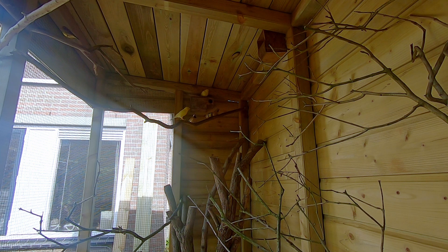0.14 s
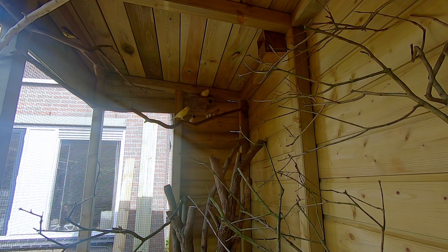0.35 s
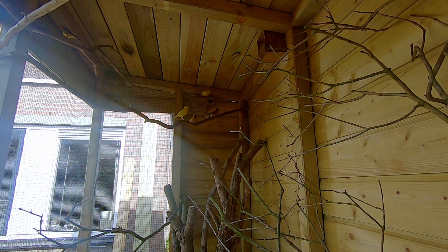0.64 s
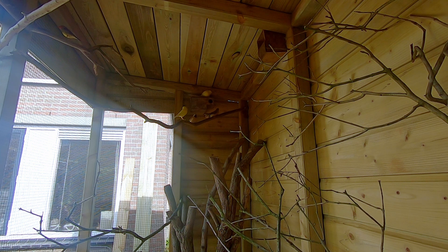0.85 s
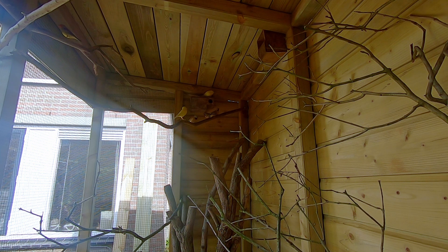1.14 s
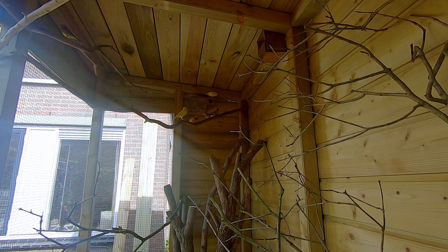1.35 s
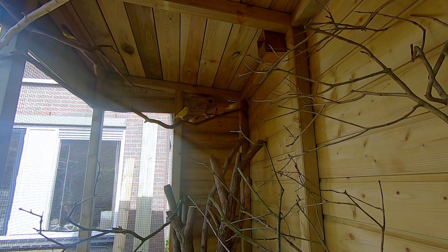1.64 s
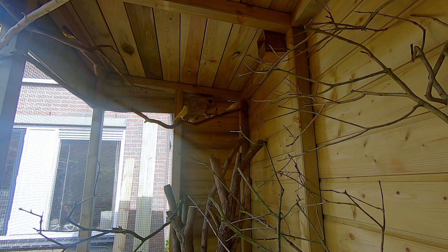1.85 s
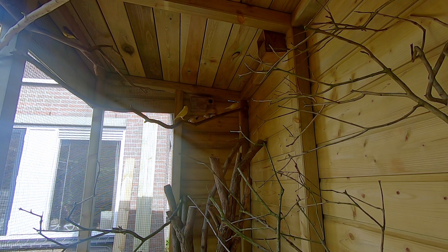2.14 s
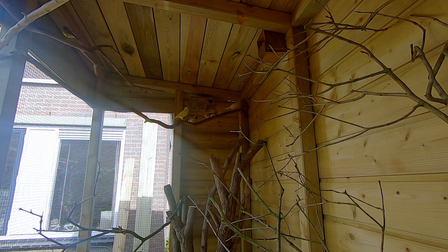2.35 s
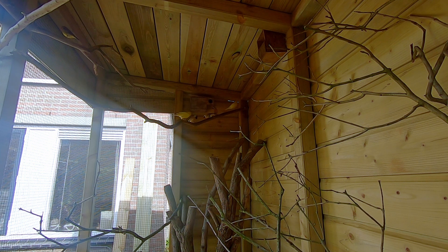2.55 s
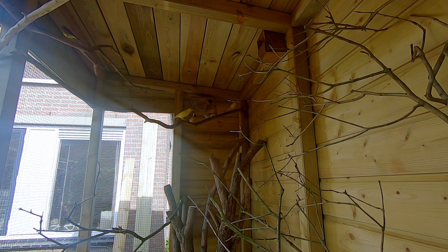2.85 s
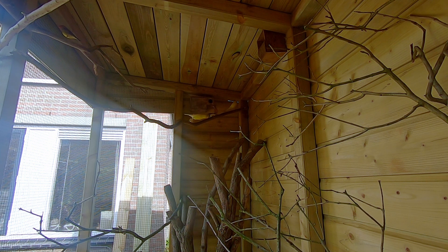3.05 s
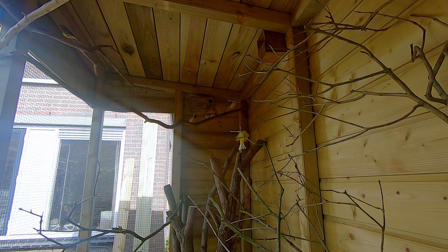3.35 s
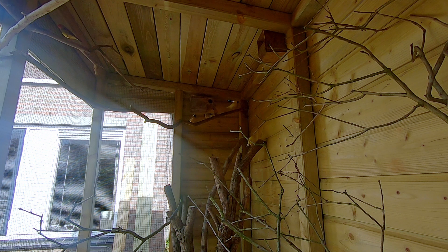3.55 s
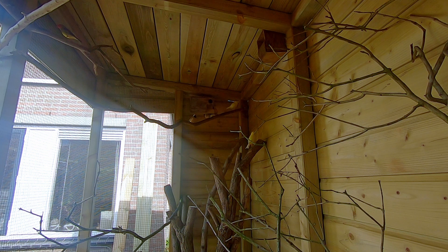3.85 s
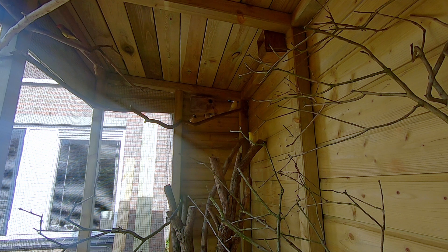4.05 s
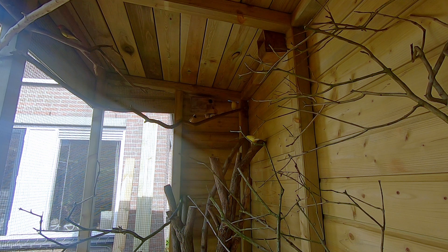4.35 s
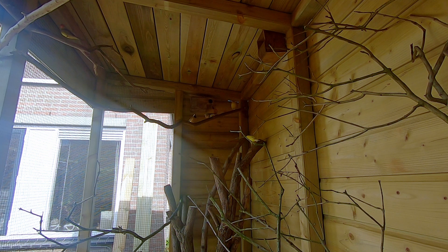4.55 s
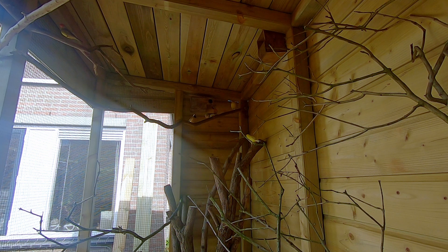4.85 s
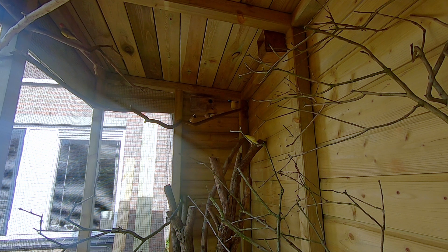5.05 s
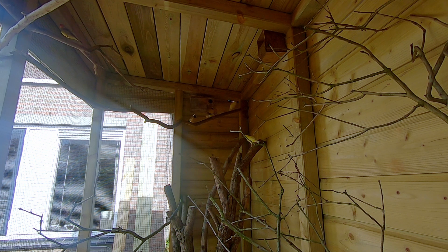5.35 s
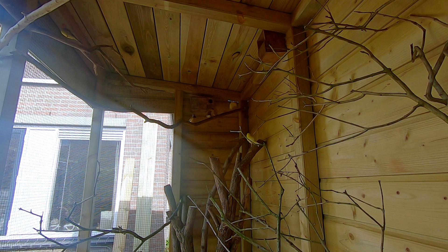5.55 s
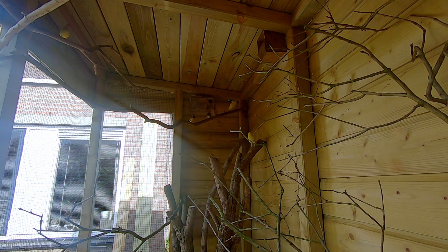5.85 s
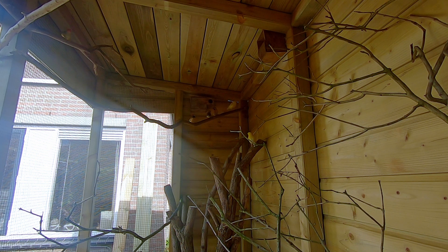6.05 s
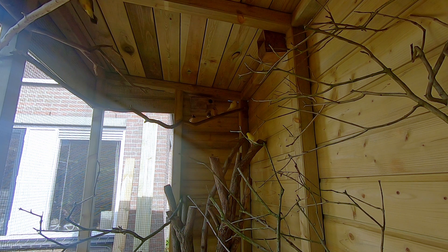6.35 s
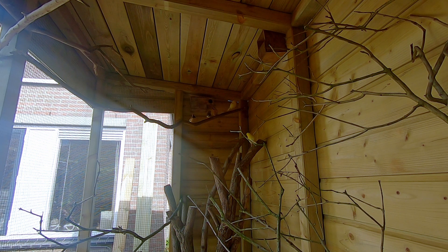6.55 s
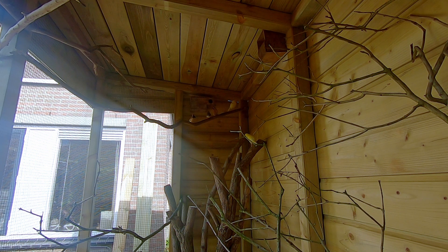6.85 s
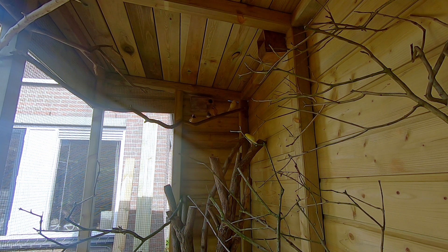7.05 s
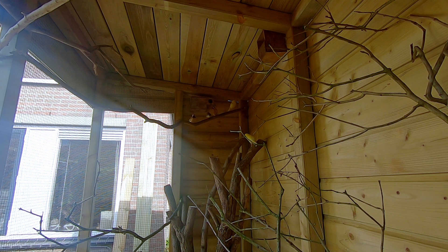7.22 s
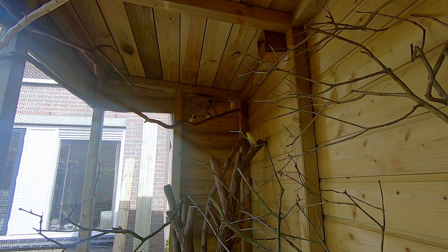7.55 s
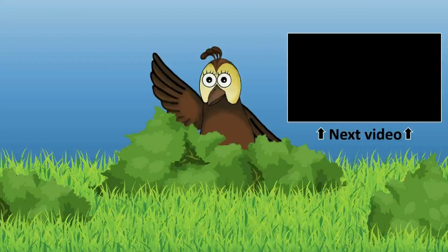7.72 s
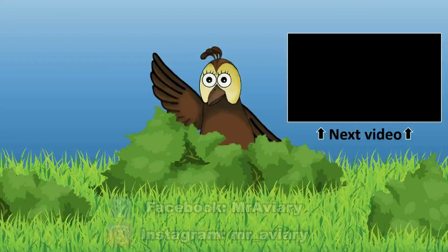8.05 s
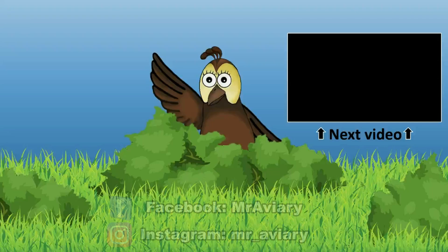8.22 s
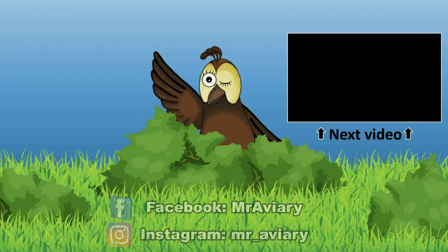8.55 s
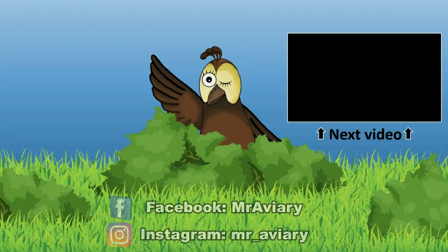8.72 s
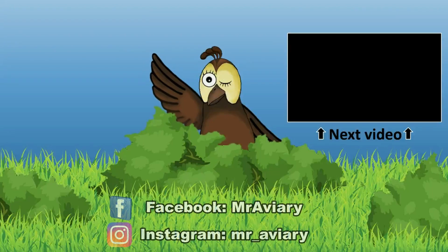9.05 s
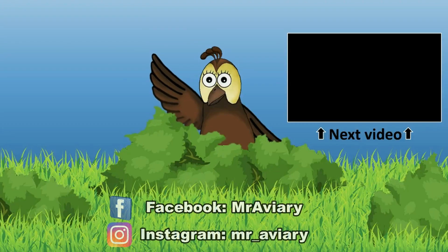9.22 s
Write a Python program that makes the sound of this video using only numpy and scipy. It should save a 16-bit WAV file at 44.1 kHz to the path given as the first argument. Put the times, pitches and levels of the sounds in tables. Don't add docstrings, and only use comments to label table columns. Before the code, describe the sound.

Caged birds chirp sharply and sing husky verses in a wooden aviary, over whistled wild garden song, wing flutters and a late passing car.

```python
import sys
import numpy as np
from scipy import signal
from scipy.fft import rfft, irfft
from scipy.io import wavfile
from scipy.ndimage import uniform_filter1d

SR = 44100
rng = np.random.default_rng(int(sys.argv[2]) if len(sys.argv) > 2 else 0)


def ratio(d):
    e = np.asarray(d, float) / 20
    return 10 ** e


def pcm_store(signal):
    levels = np.round(np.clip(np.atleast_2d(signal), -1, 1) * 32767)
    wavfile.write(sys.argv[1], SR, levels.astype(np.int16).T)


N = 414099


def rms_one(x):
    return x / np.sqrt(np.mean(x ** 2) + 1e-20)


def in_time(rows):
    s, *columns = np.transpose(rows)
    return [np.interp(np.arange(N) / SR, s, c) for c in columns]


def filtered(x, order, hz, kind="low"):
    return signal.sosfilt(signal.butter(order, hz, kind, fs=SR, output="sos"), x)


def drift(rate_hz):
    r = np.exp(-2 * np.pi * rate_hz / SR)
    noise = rng.standard_normal(N + SR // 2)
    settled = signal.lfilter([1], [1, -2 * r, r * r], noise)[SR // 2:]
    return rms_one(settled)


def pan(x, db):
    return x * ratio([[db / 2], [-db / 2]])


def whistle(notes, octave_db, edge=.004, wobble_hz=0, flutter_db=0):
    out, clock = np.zeros(N), np.arange(N) / SR
    wobble_hz, flutter_db = wobble_hz + out, flutter_db + out
    for note in notes:
        s, hz, db = np.transpose(note)
        first = max(int((s[0] - edge) * SR), 0)
        last = min(int((s[-1] + edge) * SR), N)
        span = slice(first, last)
        t = clock[span]
        phase = 2 * np.pi * np.cumsum(np.interp(t, s, hz) + wobble_hz[span]) / SR
        fade = np.clip(np.minimum(t - s[0], s[-1] - t) / edge + 1, 0, 1) ** 2
        level = np.sqrt(2) * fade * ratio(np.interp(t, s, db) + flutter_db[span])
        out[span] += level * (np.sin(phase) + ratio(octave_db) * np.sin(2 * phase))
    return out


def glides(rows, attack, release, edge_db, bend):
    share = np.array([0, attack, .5 * (attack + 1 - release), 1 - release, 1])
    level = edge_db * np.array([1, 0, 0, 0, 1])
    return [np.transpose([s + length * share, first + (last - first) * share ** bend, db + level])
            for s, length, first, last, db in rows]


def placed(shape, s, db):
    return np.array(shape) + [s, 0, db]


def trill(shape, first, period, first_db, last_db, count):
    levels = np.linspace(first_db, last_db, count)
    return [placed(shape, first + k * period, db) for k, db in enumerate(levels)]


def echoes(x, t60, gap, sparse):
    t = np.arange(SR // 2) / SR
    uneven = rng.exponential(1, (2, len(t))) ** sparse
    tail = rng.standard_normal((2, len(t))) * uneven * ratio(-60 * t / t60) * (t > gap)
    tail /= np.sqrt(np.sum(tail ** 2, axis=1, keepdims=True))
    return signal.fftconvolve(x[None], tail, axes=1)[:, :N]


def spells(rows):
    t = np.arange(N) / SR
    power = 1e-11
    for s, length, db in rows:
        away = np.maximum(np.maximum(s - t, t - s - length), 0)
        power = power + ratio(2 * (db - 153 * away))
    return 10 * np.log10(power)


# (frequency [Hz], likeness [0-1])
DIFFUSE_LIKENESS = [(60, .82), (150, .92), (300, .95), (450, .9), (700, .82), (2500, .65), (8000, .3)]


def at_hz(points, hz):
    table = np.array(points)
    return np.interp(np.log(hz), np.log(table[:, 0]), table[:, 1])


def coloured(spectrum, alike):
    hz = np.fft.rfftfreq(N, 1 / SR) + 1
    mid, side = rfft(rng.standard_normal((2, N))) * ratio(at_hz(spectrum, hz))
    c = np.clip(alike * at_hz(DIFFUSE_LIKENESS, hz), 0, 1)
    both = np.sqrt(1 + c) * mid + np.sqrt(1 - c) * side * [[1], [-1]]
    return irfft(both, N) * N / np.sqrt(np.sum(np.abs(both[:, hz < 1500]) ** 2))


# (time after onset [s], pitch [Hz], level [dB])
CHIP_SHAPE = [(-.035, 6190, -26.5), (-.021, 6060, -34), (-.008, 5150, -20), (0, 4760, -1.5),
              (.009, 4740, -0.5), (.02, 4703, -10), (.028, 4710, -25)]
DRAWL_SHAPE = [(0, 5800, -11), (.011, 5730, 3), (.021, 5370, -4), (.031, 5540, -10.5), (.041, 5430, -7.5),
               (.053, 4803, -0.5), (.1, 4730, -4), (.14, 4493, -2.5), (.153, 4350, -24)]
# (time after onset [s], pitch [Hz], level [dB])
FLICK_SHAPE = [
    (0.022, 5670, -2),
    (.027, 7030, -12),
    (.032, 6900, -22.5),
]
# (time [s], level [dB], left-right [dB], right lag [samples])
CHIP_CALLS = [
    (0.974, -22.5, 1.5, 0),
    (2.259, -26, 0.1, 0),
    (3.546, -23.5, -1, 0),
]
DRAWL_CALLS = [
    (5.433, -27, 0.5, 0),
    (8.593, -30, 2.8, 1),
]


def canaries():
    sung = [([CHIP_SHAPE], *row) for row in CHIP_CALLS]
    sung += [([DRAWL_SHAPE, FLICK_SHAPE], *row) for row in DRAWL_CALLS]
    flutter_db = 2.0 * drift(71)
    direct, calls = np.zeros((2, N)), np.zeros(N)
    for voices, s, db, left_db, lag in sung:
        notes = [placed(voice, s, db) for voice in voices]
        call = whistle(notes, octave_db=-30, flutter_db=flutter_db)
        direct += pan(np.array([call, np.roll(call, round(lag))]), left_db)
        calls += call
    walls = echoes(calls, t60=0.11, gap=0.00387, sparse=0.47)
    return direct + ratio(-5.5) * walls + ratio(-20.0) * walls.sum(axis=0)


# (time [s], length [s], first pitch [Hz], last pitch [Hz], level [dB])
FINCH_NOTES = [(1.478, .012, 4940, 4540, -58), (1.482, 0.026, 7800, 7800, -68),
               (1.535, 0.0198, 5220, 4280, -59), (1.585, .04, 4310, 2960, -64),
               (1.64, 0.039, 5050, 5150, -72), (1.7, 0.064, 3080, 3150, -70.5),
               (1.763, .036, 4900, 4250, -52.5), (1.795, 0.023, 4100, 3230, -57),
               (1.85, 0.036, 3400, 3500, -64.5), (1.93, .055, 5200, 5170, -72.5),
               (1.955, 0.027, 7770, 7660, -68.5), (1.95, 0.068, 3800, 4220, -69.5),
               (2.0, 0.059, 4430, 5170, -54.5), (2.055, 0.038, 5370, 5340, -60),
               (2.04, .045, 4270, 4010, -54.5), (2.135, .03, 3140, 3150, -60),
               (2.222, 0.011, 5720, 6200, -50.5), (2.345, 0.0076, 5920, 5200, -49.5),
               (2.35, 0.034, 6700, 6600, -66), (2.415, .007, 5000, 4000, -53)]
# (shift [s], level [dB])
FINCH_REPEATS = [
    (-1.287, -2),
    (0, 0),
    (1.285, 0),
]
# (time [s], fundamental [Hz], level [dB])
NASAL_CALLS = [
    [(2.515, 1095, -82), (2.55, 1040, -77), (2.585, 1020, -75)],
    [(2.59, 1000, -78), (2.62, 1056, -75), (2.648, 1070, -76)],
]
# (time after onset [s], pitch [Hz], level [dB])
TICK_SHAPE = [
    (-.004, 7030, 1),
    (0, 5370, 8.5),
    (.002, 4750, 12.5),
    (.005, 2620, -10),
]
# (time [s], level before a common lift [dB])
FINCH_TICKS = [
    (0.0855, -59.5),
    (1.373, -58.5),
    (2.6587, -57.5),
    (3.948, -57.5),
]


def finches():
    verse = glides(FINCH_NOTES, attack=0.64, release=0.52, edge_db=-7.0, bend=1.2)
    sung = [placed(note, s, db) for s, db in FINCH_REPEATS for note in verse]
    verses = whistle(sung, octave_db=-21.5, wobble_hz=130 * drift(210), flutter_db=5.3 * drift(87))
    nasal = [np.array(call) * [1, k, 1] + [0, 0, 8 - 1.5 * k] for call in NASAL_CALLS for k in range(3, 9)]
    verses += whistle(nasal, octave_db=-60, wobble_hz=60 * drift(150), flutter_db=3.7 * drift(60))
    ticks = [placed(TICK_SHAPE, s, db + 14.5) for s, db in FINCH_TICKS]
    ticks = whistle(ticks, octave_db=-35, edge=0.002)
    near = echoes(verses + ticks, t60=0.09, gap=0.002, sparse=1.1)
    far = echoes(verses + ticks, t60=0.25, gap=0.0055, sparse=0.79)
    return 0.8 * verses + .5 * ticks + ratio(0.5) * near + ratio(-16) * far


# (time [s], peak level [dB])
LANDINGS = [(0.1411, -53), (0.4964, -50), (0.854, -55), (1.1334, -64), (1.267, -48), (1.4744, -62),
            (3.2221, -60), (3.2594, -57), (3.3444, -53), (3.6346, -59), (7.226, -68)]


def perch():
    s, db = np.transpose(LANDINGS)
    hits = np.zeros(N)
    hits[(s * SR).astype(int)] = ratio(db + 3)
    t60_s = .006
    dying = signal.lfilter([1], [1, -ratio(-60 / (t60_s * SR))], hits + 1e-18)
    snap = filtered(dying * rng.standard_normal(N), 2, [1500, 11000], "band")
    return snap + ratio(-2.0) * echoes(snap, t60=.08, gap=.002, sparse=.8)


# (frequency [Hz], density [dB per Hz])
FEATHER_SPECTRUM = [(120, -10.5), (220, 0), (500, -11), (1500, -3.5), (3500, 1.5), (7000, 2), (10500, -13),
                    (15000, -27)]
# (time [s], length [s], level [dB])
WING_FLURRIES = [(0.0, 4.03, -83.5), (0.0, 0.17, -71), (0.45, 0.11, -70), (1.2, 0.13, -72.5),
                 (1.7, 0.11, -79.5), (2.5, 0.17, -81), (3.26, .26, -71), (3.72, 0.23, -75.5),
                 (4.0, 3.08, -88.5), (5.03, 0.25, -73.5), (6.4, 0.23, -75)]


def wings():
    beat_hz = 22.5
    cycle = 2 * np.pi * beat_hz * (np.arange(N) / SR - 3.35)
    beat_db = 4 * np.cos(cycle + .4 * drift(3)) + 1.5 * drift(120)
    return rms_one(coloured(FEATHER_SPECTRUM, alike=0.7)) * ratio(spells(WING_FLURRIES) + 11.5 + beat_db)


# (time [s], first level [dB], full level [dB], echo level [dB])
TIT_LOW_NOTES = [(-0.12, -50, -38, -44.5), (0.319, -43.5, -33, -47), (0.766, -40.5, -35.5, -46.5),
                 (3.665, -49, -42.5, -52), (4.162, -43.5, -33.5, -45.5), (4.605, -44, -39, -44.5),
                 (5.024, -43.5, -37, -43), (5.444, -51, -39, -44.5), (5.962, -43.5, -40, -45),
                 (8.915, -49, -45.5, -51.5), (9.358, -50, -43, -50)]


def tit_low_note(s, first_db, full_db, echo_db):
    after = np.array([0, .03, .06, .084, .12, .127, .15, .24, .39])
    db = [first_db - 15.5, first_db, first_db + 2.5, full_db, full_db - 4,
          echo_db - 10, echo_db, echo_db - 19, echo_db - 28]
    hz = 3862 - 110 * (after == 0) - 48 * after
    return np.transpose([s + after, hz, db])


def tit_low():
    notes = [tit_low_note(*row) for row in TIT_LOW_NOTES]
    tone = whistle(notes, octave_db=-45, edge=.01, wobble_hz=12 * drift(8), flutter_db=1.5 * drift(40))
    t, starts = np.arange(N) / SR, np.array(TIT_LOW_NOTES)[:, 0]
    since = t - starts[np.searchsorted(starts, t) - 1]
    beat_hz, peak_s, floor = 37, .093, .25
    beat = floor + np.abs(np.cos(np.pi * beat_hz * (since - peak_s) + .4 * drift(6)))
    return tone * np.where((since > .068) & (since < .17), beat, 1)


# (time after onset [s], pitch [Hz], level [dB])
HOOK_SHAPE = [(-.002, 6000, -22), (.003, 5740, -6), (.014, 5660, -7), (.066, 5600, -16), (.075, 5620, -30),
              (.2, 5620, -42)]
# (time [s], peak level [dB])
TIT_HIGH_NOTES = [(0.0902, -31), (0.5296, -32.5), (0.977, -32.5), (3.873, -35), (4.3637, -32),
                  (4.8042, -32), (5.231, -32), (5.6875, -35), (6.1798, -33), (9.134, -40.5)]


def tit_high():
    notes = [placed(HOOK_SHAPE, s, db) for s, db in TIT_HIGH_NOTES]
    return whistle(notes, octave_db=-40, flutter_db=2.0 * drift(60))


# (time [s], length [s], first pitch [Hz], last pitch [Hz], level [dB])
BLACKBIRD_NOTES = [ (0.125, 0.074, 2780, 2160, -59), (.185, 0.017, 2700, 1990, -57.5),
                   (.26, 0.017, 2170, 2050, -61.5), (2.285, 0.1, 1770, 2740, -50.5),
                   (2.485, 0.084, 2550, 2550, -45), (3.16, 0.012, 2110, 2490, -49.5),
                   (3.172, 0.013, 2530, 2540, -46.5), (3.184, .01, 2450, 2250, -48),
                   (3.2, .045, 2490, 2400, -61), (3.46, 0.12, 2520, 2062, -58.5),
                   (3.65, .09, 2920, 2730, -66), (3.75, 0.053, 3180, 3340, -45),
                   (3.815, 0.049, 3640, 3500, -46), (4.64, 0.084, 2820, 2690, -70),
                   (4.68, 0.034, 2100, 2200, -71), (4.91, 0.034, 2465, 2600, -69),
                   (6.745, 0.067, 1800, 2300, -53), (6.8, 0.037, 2317, 2720, -50),
                   (6.97, 0.051, 1660, 1632, -59.5), (7.07, .12, 1638, 1706, -59),
                   (7.14, 0.034, 2100, 2390, -58.5), (7.17, .09, 2300, 2250, -53.5),
                   (7.255, 0.087, 2200, 2176, -47.5), (7.34, 0.048, 2094, 2200, -55),
                   (7.885, .07, 1980, 2020, -48.5), (7.955, .022, 1950, 1760, -57),
                   (8.28, 0.19, 2060, 2280, -58), (8.45, 0.081, 2240, 2190, -55),
                   (8.64, 0.081, 2050, 2390, -60), (8.78, 0.14, 1850, 1950, -62.5)]
WARBLER_NOTES = [ (3.335, 0.053, 7300, 6060, -59), (3.35, .25, 6240, 6040, -62),
                 (3.73, 0.051, 6140, 6460, -56.5), (3.82, .035, 7560, 7120, -65),
                 (5.8, 0.17, 3170, 3320, -64), (6.02, 0.18, 7300, 6630, -59), (6.18, 0.12, 6600, 6670, -57),
                 (6.37, .3, 7010, 6460, -58), (6.47, 0.082, 4270, 4270, -59),
                 (6.699, 0.05, 6150, 5470, -46), (6.752, .012, 5510, 5620, -51.5),
                 (6.825, 0.052, 6180, 5320, -46.5), (7.0, 0.093, 4170, 4190, -66),
                 (7.73, 0.031, 7000, 6550, -73), (7.86, 0.054, 7400, 6270, -72),
                 (8.21, .1, 6250, 6500, -72), (8.3, 0.34, 6420, 6700, -68), (8.5, .045, 5900, 5940, -69),
                 (8.7, 0.21, 6100, 6000, -73), (8.755, 0.045, 4200, 4100, -59), (9.18, .2, 6140, 6750, -76)]


def clear_song():
    notes = glides(BLACKBIRD_NOTES, attack=0.38, release=0.14, edge_db=-6.0, bend=.85)
    notes += glides(WARBLER_NOTES, attack=0.19, release=0.2, edge_db=-4.0, bend=0.51)
    return whistle(notes, octave_db=-42, edge=.012, wobble_hz=14 * drift(25), flutter_db=2.4 * drift(35))


# (time [s], length [s], first pitch [Hz], last pitch [Hz], level [dB])
BUZZ_NOTES = [ (0.0, 0.0387, 1990, 1864, -54.5), (7.7, 0.111, 2490, 2450, -58.5),
              (7.6, 0.075, 3120, 3930, -67.5), (2.33, 0.075, 1702, 2500, -59.5),
              (2.82, 0.15, 2700, 2250, -55.5), (.63, .12, 3550, 3250, -62), (2.955, 0.04, 2250, 1800, -61),
              (3.015, 0.184, 1894, 1865, -60), (6.77, 0.097, 1853, 2496, -56.5),
              (7.36, 0.078, 2096, 1746, -56.5), (7.43, 0.094, 1752, 1837, -57.5),
              (7.505, .145, 1816, 2584, -56), (7.68, 0.1084, 2690, 2900, -58.5),
              (7.68, 0.071, 2413, 1760, -51.5), (7.75, 0.0526, 2092, 1620, -58)]


def blackbird_buzz():
    t = np.arange(N) / SR
    notes = glides(BUZZ_NOTES, attack=0.22, release=0.75, edge_db=-0.5, bend=0.96)
    shake_hz = np.where(t < 2.98, 105, np.where(t < 5, 65, 50))
    throb = np.sin(2 * np.pi * shake_hz * t + 1.2 * drift(20))
    depth_hz = np.where(abs(t - 2.89) < .08, 280, 150)
    buzz = whistle(notes, octave_db=-35, edge=.015, wobble_hz=depth_hz * throb + 90 * drift(300),
                   flutter_db=-3 * throb + 2 * drift(200))
    return filtered(buzz, 6, 1600, "high")


# (time [s], pitch [Hz], level [dB])
WARBLE_NOTE = [
    (6.89, 2140, -56),
    (6.97, 2180, -59),
    (7.07, 2150, -56),
]


def blackbird_warble():
    shake = np.cos(2 * np.pi * 29 * (np.arange(N) / SR - 6.9))
    return whistle([WARBLE_NOTE], octave_db=-30, wobble_hz=110 * shake, flutter_db=-3 * shake)


# (time after onset [s], pitch [Hz], level [dB])
ROLL_SHAPE = [(0, 4750, -9), (.014, 4290, -4), (.045, 4530, 0), (.065, 4570, -3), (.082, 4350, -8),
              (.1, 4280, -11)]
SLUR_SHAPE = [
    (0, 5900, -6),
    (.009, 5550, 0),
    (.022, 5050, -6),
]


def trills():
    first_s = 6.925
    notes = trill(ROLL_SHAPE, first_s, .1075, -53, -59, count=7)
    notes += trill(SLUR_SHAPE, 7.962, .0585, -60.5, -64, count=11)
    lift_hz = 178.5 * np.exp(-np.abs(np.arange(N) / SR - first_s) / 0.253)
    return whistle(notes, octave_db=-50, wobble_hz=30 * drift(31) + lift_hz, flutter_db=3.9 * drift(60))


# (time [s], length [s], first pitch [Hz], last pitch [Hz], level [dB])
FAR_NOTES = [ (1.299, 0.113, 4800, 3700, -60.5), (3.8, 0.053, 6000, 6300, -68),
             (4.703, 0.12, 5700, 4910, -69), (5.3, 0.21, 3760, 3880, -58.5), (5.6, 0.12, 2546, 2474, -68.5),
             (5.68, 0.25, 3850, 3813, -57.5), (6.15, 0.149, 3850, 3747, -55), (6.42, .38, 3500, 3716, -64),
             (6.678, 0.0123, 5500, 6200, -48), (7.155, 0.057, 5700, 5200, -74),
             (7.56, 0.043, 3480, 3420, -71.5), (7.68, .17, 3000, 3200, -72), (4.46, 0.043, 4400, 4200, -60),
             (8.16, 0.13, 2200, 1950, -65), (8.0, .14, 1900, 2150, -68), (8.21, .19, 7500, 7500, -69),
             (7.985, .075, 7790, 7790, -73), (6.85, .13, 2900, 2850, -71), (6.66, .12, 3800, 3780, -64),
             (6.85, 0.085, 3400, 3300, -64.5), (7.42, .05, 4950, 4900, -73), (2.7, .04, 5750, 5200, -66.5),
             (5.1, 0.039, 2600, 2700, -68), (6.0, .29, 2230, 2190, -75)]


def far_birds():
    notes = glides(FAR_NOTES, attack=.3, release=0.45, edge_db=-5.5, bend=0.6)
    return whistle(notes, octave_db=-51, edge=.015, wobble_hz=30 * drift(60), flutter_db=3.7 * drift(45))


def garden():
    tit = tit_low()
    rough = blackbird_buzz() + trills()
    song = far_birds() + tit_high() + clear_song() + blackbird_warble() + rough
    tail = echoes(song + .6 * tit + 1.5 * rough, t60=.55, gap=.008, sparse=1.2)[0]
    return tit + song + ratio(-12.0) * tail


def coarse_sampling(x):
    slope = np.diff(x, prepend=0)
    bursts = ratio(4.5 * np.clip(drift(220), -2, 2))
    jitter = rms_one(filtered(rng.standard_normal(N), 4, 550))
    clock = np.cos(2 * np.pi * 16000 * np.arange(N) / SR)
    mirror = filtered(slope * clock * jitter, 6, 8000, "high")
    loudness = uniform_filter1d(np.abs(slope), size=200)
    crackle = filtered(rng.standard_normal(N), 2, 2500, "high") * loudness
    knee = loudness / (loudness + ratio(-63))
    damage = ratio(-11.0) * mirror + ratio(-12) * slope * jitter + ratio(-18.5) * crackle
    return x + knee * bursts * damage


# (time [s], length [s], level [dB])
CHATTER_SPELLS = [(0.0, 6.9, -79), (0.24, 0.062, -67), (0.62, 0.16, -71), (1.24, 0.017, -64.5),
                  (1.55, 0.28, -76.5), (2.25, .2, -72), (2.7, 0.1, -69.5), (3.22, 0.11, -72),
                  (3.58, 0.31, -68), (5.1, 0.16, -68), (5.5, 0.065, -66.5), (5.8, 1, -74.5),
                  (7.92, 1.5, -73)]


def chatter():
    notes = []
    for start, pitch, size, bend in rng.random((600, 4)):
        s, hz = start * N / SR, 2900 * 1.9 ** pitch
        db, b = 8 * size - 3 * pitch, .3 * bend - .05
        notes.append(np.array([(s, hz * (1 + b), db - 8), (s + .012, hz, db), (s + .03, hz * (1 - b), db - 8)]))
    chirps = rms_one(whistle(notes, octave_db=-29.0, wobble_hz=120 * drift(300)))
    chirps = chirps * ratio(spells(CHATTER_SPELLS) + 8.5)
    tails = echoes(chirps, t60=.5, gap=.005, sparse=.5)
    return .25 * chirps + .6 * tails[0] + .8 * tails


# (time [s], level [dB])
CAR_PASS = [
    (7.84, -84),
    (7.95, -61),
    (8.2, -57.5),
    (8.8, -61),
    (9.39, -60),
]
# (frequency [Hz], density [dB per Hz])
ROAD_SPECTRUM = [(35, -49), (60, -21), (259, -12), (427, 5.5), (543, -8.5), (1610, -13.5), (2190, -7.5),
                 (6660, -16), (11000, -32), (14300, -86.5), (22000, -120)]


def car():
    level_db, = in_time([(4.8, -84.5)] + list(CAR_PASS))
    return ratio(level_db + 1.2 * drift(11.0)) * coloured(ROAD_SPECTRUM, alike=0.88)


# (time [s], level [dB])
ENGINE_LEVEL = [
    (4.8, -76.5),
    (5.4, -67.5),
    (7.3, -74.5),
    (7.9, -60.5),
    (8.3, -66),
    (9.0, -72),
]


def drone():
    noise = rng.standard_normal(N)
    hum = np.zeros(N)
    for hz, sharpness in [(170, 4.1), (420, 27)]:
        hum += signal.lfilter(*signal.iirpeak(hz, sharpness, fs=SR), noise)
    return rms_one(hum) * ratio(*in_time(ENGINE_LEVEL))


# (frequency [Hz], density [dB per Hz])
AIR_SPECTRUM = [(18, -7.5), (30, 3.5), (143, -3), (260, -11.5), (394, -0.5), (524, -13.5), (928, -15),
                (2490, -21), (4000, -18.5), (6000, -33.5), (10000, -47), (15000, -49)]


def air():
    return ratio(-66.5 + 2.0 * drift(4.8)) * coloured(AIR_SPECTRUM, alike=1.05)


def scene():
    caged = filtered(canaries() + finches(), 4, 11500)
    around = wings() + coarse_sampling(garden()) + chatter() + car() + drone() + air()
    return pan(around, 1.4) + caged + perch()


def band_limit(x):
    return signal.sosfilt(signal.butter(12, 15750, fs=SR, output="sos"), x)


def record(dry):
    return band_limit(dry)


dry = scene()
out = record(dry)
pcm_store(out)
```